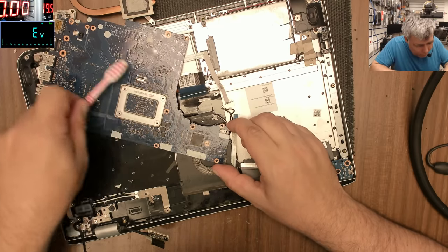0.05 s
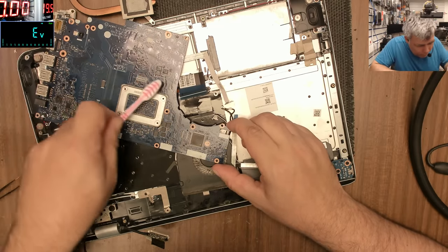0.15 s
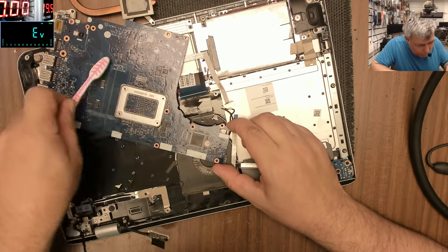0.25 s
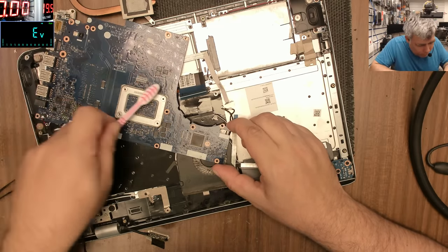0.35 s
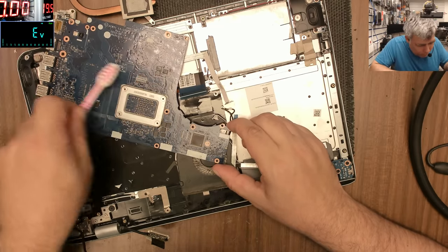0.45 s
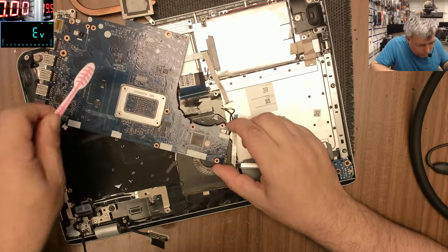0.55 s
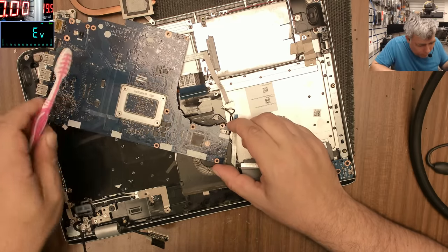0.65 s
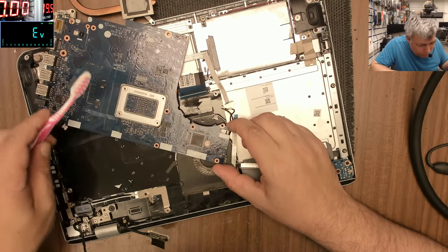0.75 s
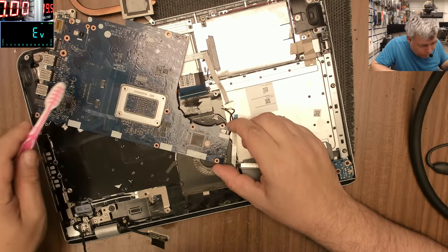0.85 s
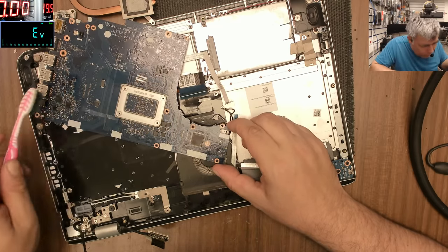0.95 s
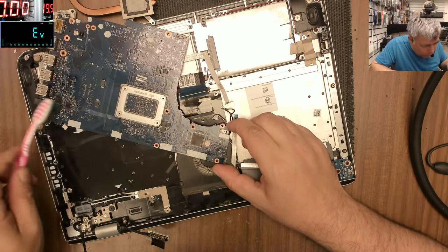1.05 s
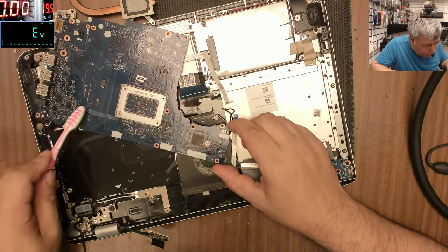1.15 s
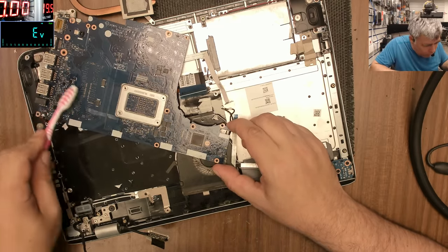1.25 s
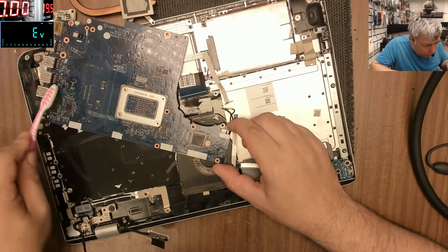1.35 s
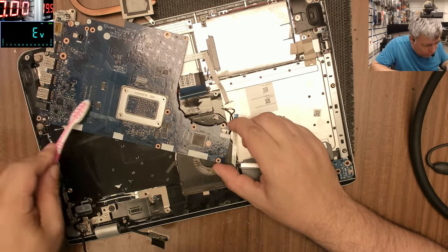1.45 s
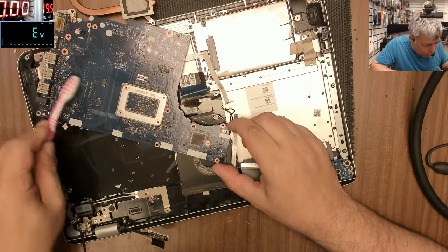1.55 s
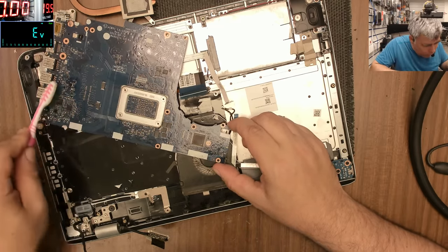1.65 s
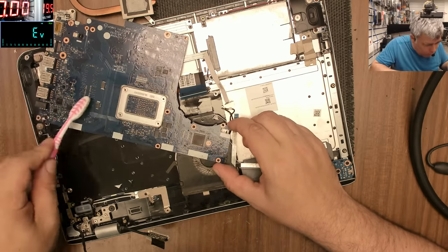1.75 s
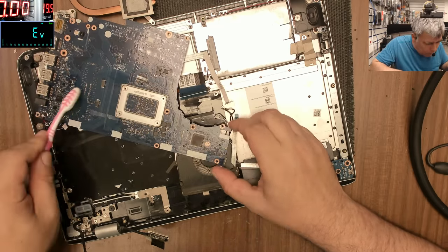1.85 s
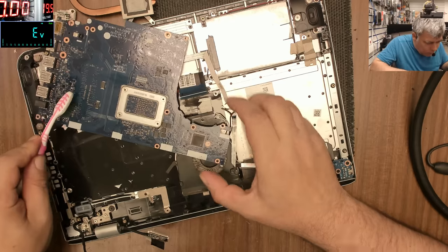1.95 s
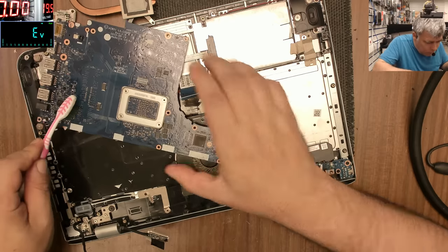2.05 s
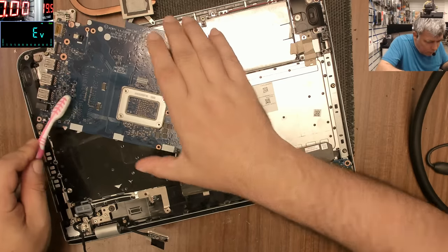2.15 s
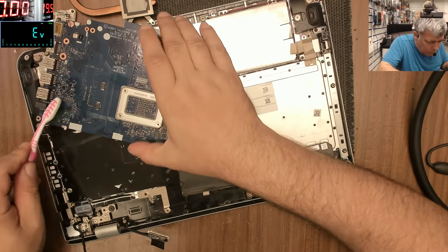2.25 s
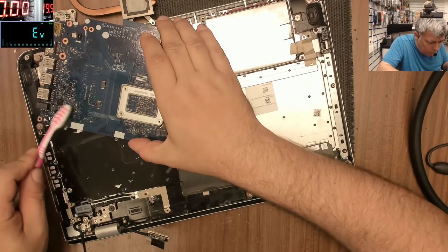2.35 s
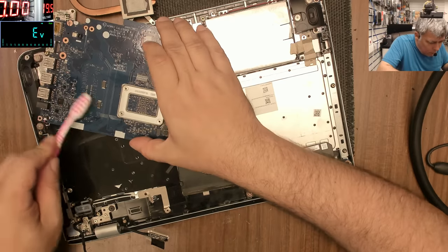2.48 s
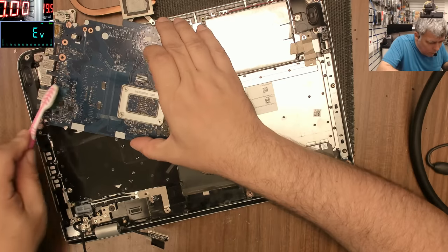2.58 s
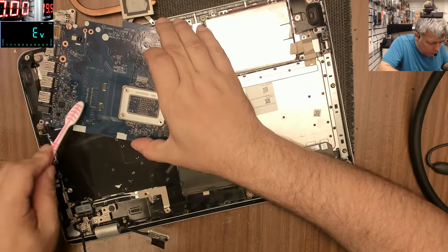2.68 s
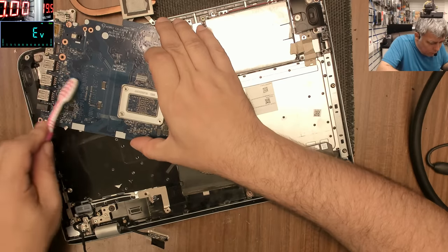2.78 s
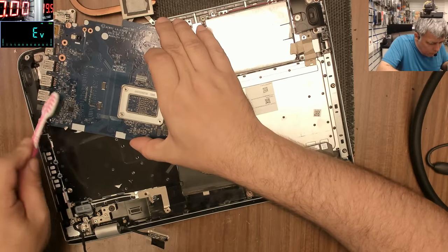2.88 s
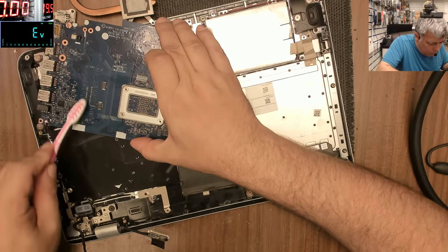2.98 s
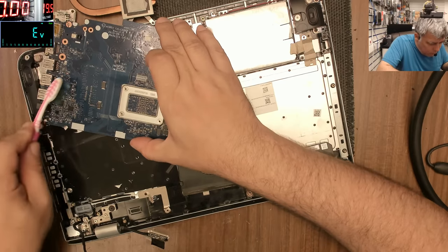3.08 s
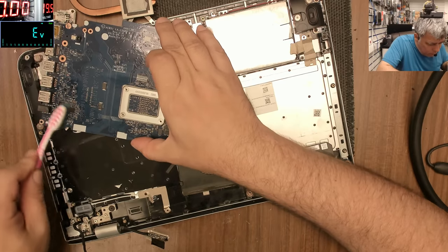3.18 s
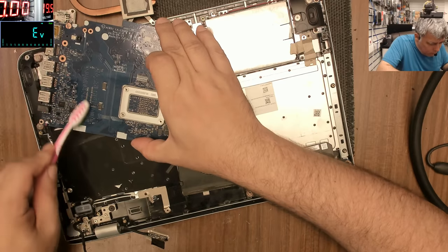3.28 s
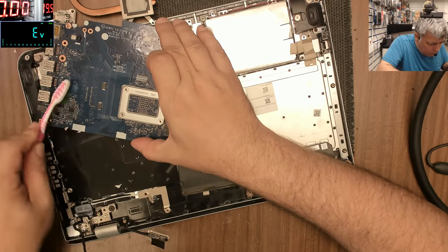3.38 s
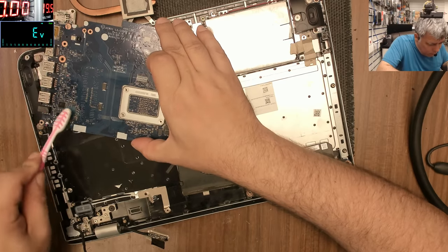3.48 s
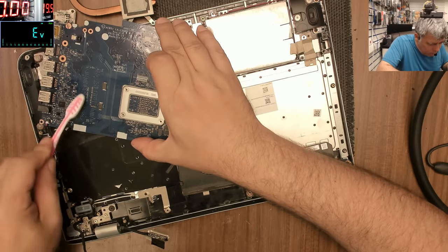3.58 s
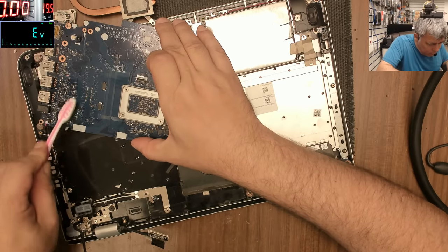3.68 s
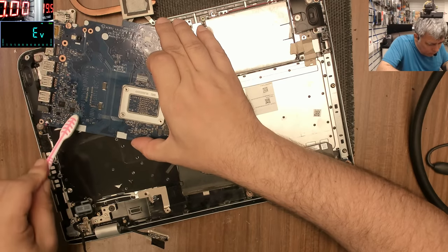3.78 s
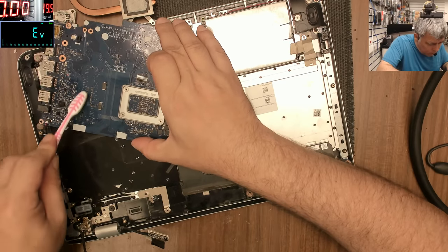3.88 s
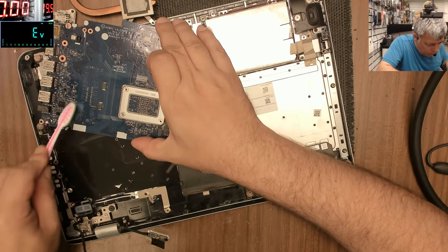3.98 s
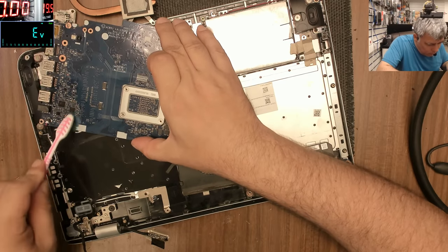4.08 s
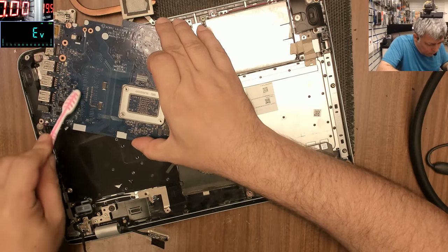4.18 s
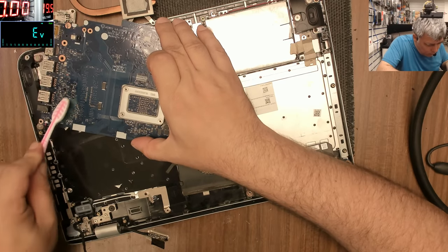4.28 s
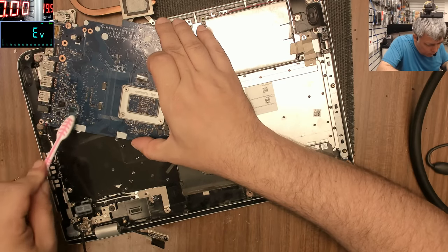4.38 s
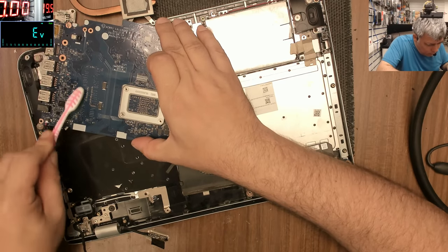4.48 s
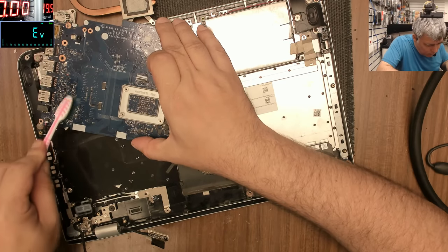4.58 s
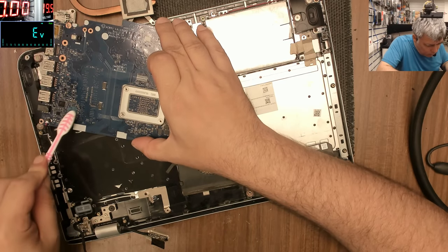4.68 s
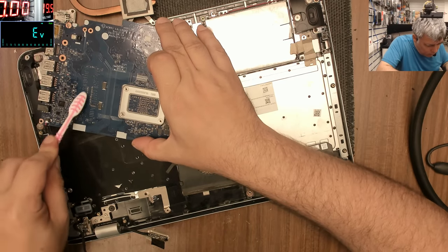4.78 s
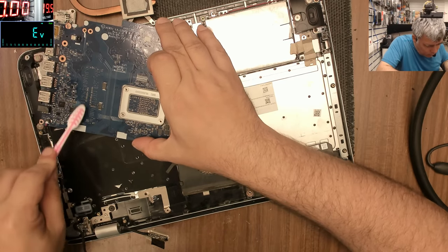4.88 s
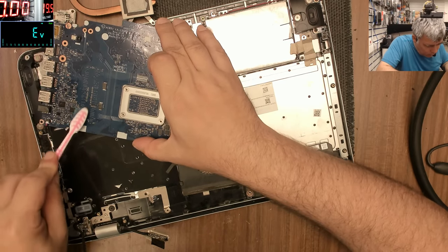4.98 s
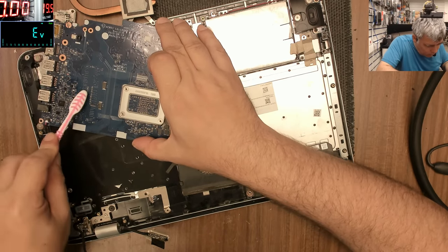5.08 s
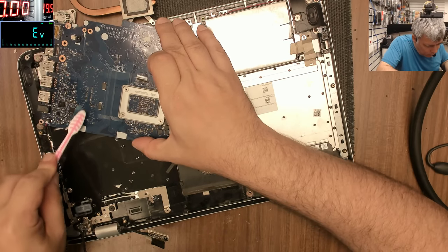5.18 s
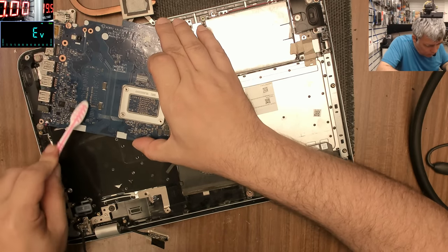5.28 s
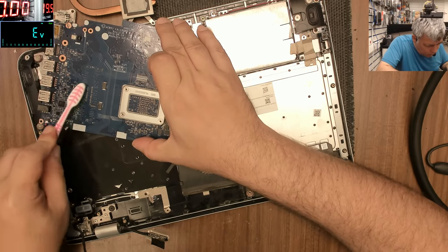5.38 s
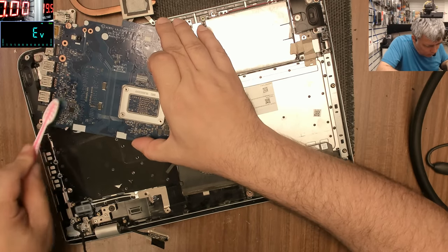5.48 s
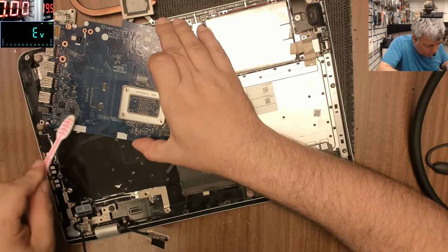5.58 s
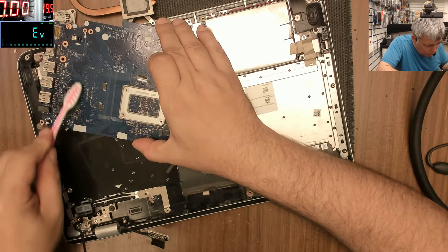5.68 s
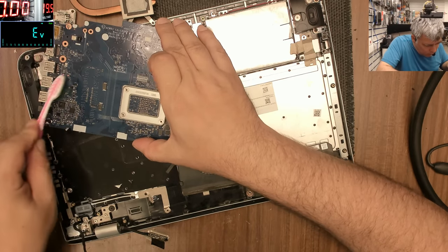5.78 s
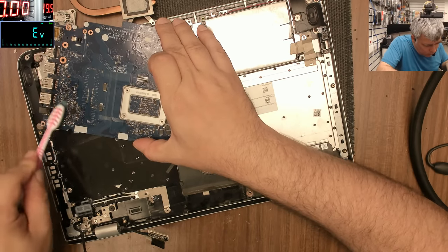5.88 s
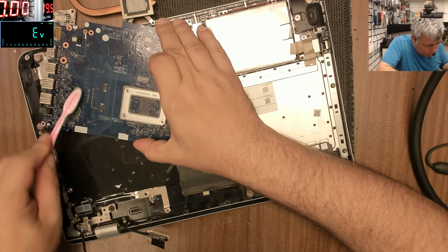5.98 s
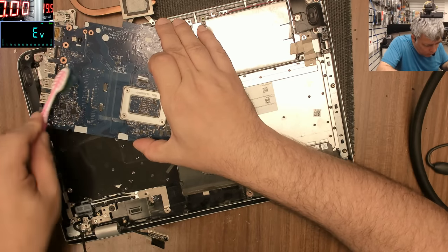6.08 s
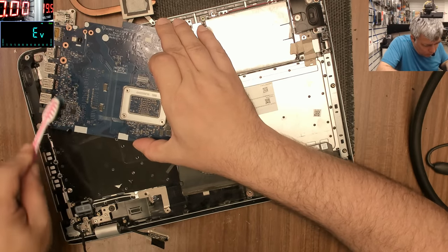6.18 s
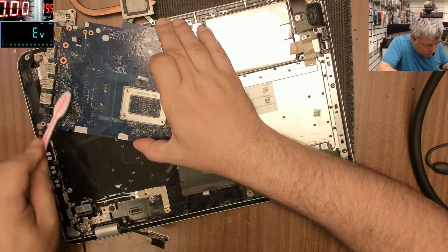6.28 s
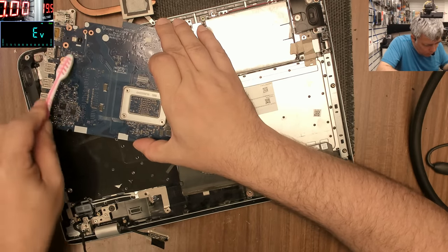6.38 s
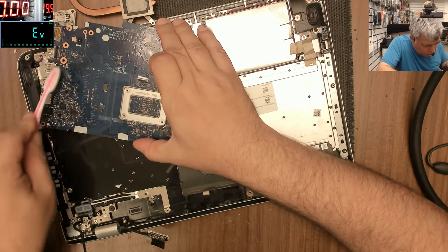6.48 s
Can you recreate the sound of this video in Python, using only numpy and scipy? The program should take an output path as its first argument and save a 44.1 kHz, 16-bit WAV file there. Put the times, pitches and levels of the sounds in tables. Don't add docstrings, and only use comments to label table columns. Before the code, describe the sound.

Dry bristles rasp over electronic parts in brief bouts, then about seven strokes a second, with faint metallic ringing, plastic clicks and soft bench bumps.

```python
import sys
import numpy as np
from scipy import signal
from scipy.fft import rfft, irfft
from scipy.io import wavfile
from scipy.ndimage import uniform_filter1d

SR = 44100
rng = np.random.default_rng(int(sys.argv[2]) if len(sys.argv) > 2 else 0)


def wav_record(signal):
    frames = np.transpose(np.atleast_2d(signal))
    bounded = np.clip(frames, -1, 1)
    quanta = np.round(bounded * 32767).astype(np.int16)
    wavfile.write(sys.argv[1], SR, quanta)


def elevation(decibels):
    levels = np.asarray(decibels, float)
    return 10 ** (levels / 20)


N = 288414


def in_time(points):
    s, level = np.transpose(points)
    return np.interp(np.arange(N) / SR, s, level)


def rms_one(x):
    return x / np.sqrt(np.mean(x ** 2) + 1e-20)


def coloured(x, points):
    hz, db = np.transpose(points)
    shape = np.interp(np.log(np.fft.rfftfreq(N, 1 / SR) + 1), np.log(hz), db)
    return rms_one(irfft(rfft(x) * elevation(shape), N))


def resonate(x, modes):
    out = 0
    for k, (hz, width_hz, db) in enumerate(modes):
        r = np.exp(-np.pi * width_hz / SR)
        a = [1, -2 * r * np.cos(2 * np.pi * hz / SR), r * r]
        ring = (1 - r * r) / 2 * signal.lfilter([1, 0, -1], a, x + 1e-18)
        out = out + (-1) ** k * elevation(db) * ring
    return out


def flicks(per_s, spread_db):
    sizes = elevation(spread_db * np.minimum(rng.exponential(1, N), 4)) * rng.choice([-1, 1], N)
    return sizes * (rng.random(N) < per_s / SR)


def clumps(hz):
    r = np.exp(-2 * np.pi * hz / SR)
    wander = signal.lfilter([1], [1, -2 * r, r * r], rng.standard_normal(N + SR))
    return rms_one(wander[SR:])


def each_by_chance(x, modes, patchy_db, hz):
    return sum(resonate(x * elevation(patchy_db * clumps(hz)), [mode]) for mode in modes)


def add(out, s, sound):
    start = round(s * SR)
    out[start:start + len(sound)] += sound


# (f/Hz, level/dB)
HISS_COLOUR = [(8, 14.5), (20, 1.5), (38, -20), (60, -2), (100, -2.5), (200, -8), (400, -15.5),
               (1000, -19.5), (2200, -20), (7000, -18.5), (15500, -13.5)]
# (f/Hz, level/dB against the hiss)
HISS_SHARED = [(8, -8), (60, -6), (150, -2.5), (400, -1.5), (1500, -14), (15500, -6.5)]


def preamp_hiss():
    shared, left, right = rng.standard_normal((3, N))
    common = elevation(-8.5) * coloured(shared, HISS_SHARED)
    return elevation(-60) * coloured(common + np.array([left, right]), HISS_COLOUR)


# (t/s, level/dB)
MURMUR_LEVEL = [(0, -65), (.5, -65.5), (.9, -68), (1.4, -69.5), (2, -70.5), (2.6, -70.5), (5.7, -87.5),
                (6.54, -68)]
# (f/Hz, level/dB)
MURMUR_COLOUR = [(60, -16), (150, -3), (400, -6), (1000, -11), (3000, -12.5), (6000, -11), (12000, -14.5)]


def murmur():
    return elevation(in_time(MURMUR_LEVEL)) * coloured(rng.standard_normal(N), MURMUR_COLOUR)


# (f/Hz, level/dB)
FAN_COLOUR = [(100, 10.5), (200, -3.5), (400, 3), (800, -2.5), (1400, -2), (1800, -21), (3000, -23),
              (6000, -40.5), (12000, -22)]
# (f/Hz, width/Hz, level/dB)
FAN_HUMS = [(401.8, 10, -84), (2217, 14, -84)]


def fan():
    air = elevation(-72.5) * coloured(rng.standard_normal(N), FAN_COLOUR)
    white = rng.standard_normal(N)
    hums = 0
    for hz, width_hz, db in FAN_HUMS:
        hums = hums + elevation(db) * rms_one(resonate(white, [(hz, width_hz, 0)]))
    whine_hz = 1400 + 0.87 * clumps(2.12)
    whine_level = np.sqrt(2) * elevation(-77.5 + 1.2 * clumps(5.5))
    whine = whine_level * np.sin(2 * np.pi * np.cumsum(whine_hz) / SR)
    return air + hums + whine


# (opens t/s, shuts t/s)
GATE_OPEN = [
    (-0.1, 0.438),
    (1.410, 1.977),
    (2.581, 5.682),
    (5.773, 6.7),
]
GATE_GAIN = [2.5, -1.5, -0.5, 0.5]


def gate():
    t = np.arange(N) / SR
    gain = elevation(-37)
    for (opens_s, shuts_s), db in zip(GATE_OPEN, GATE_GAIN):
        gain = gain + elevation(db) * ((t > opens_s) & (t < shuts_s))
    return uniform_filter1d(gain, size=70)


# (t/s, level/dB, sway f/Hz, fade t/s)
ROCKS = [(0.028, -40.5, 13.4, 0.22), (0.104, -41.5, 6.7, 0.068), (0.293, -40.5, 10.3, 0.032),
         (0.464, -52, 10.2, 0.028), (1.482, -53.5, 10.9, 0.25), (1.682, -35.5, 7.5, 0.021),
         (1.752, -43.5, 10.5, 0.083), (1.856, -55, 14, 0.0054), (2.01, -44, 14.4, 0.022),
         (2.638, -46, 11.3, 0.4), (2.927, -36, 8.3, 0.063), (3.08, -51.5, 7.6, 0.51),
         (3.23, -36.5, 13.2, 0.14), (3.513, -33, 9.7, 0.088), (3.779, -32.5, 9.4, 0.065),
         (4.063, -35.5, 12, 0.13), (4.384, -41.5, 15.4, 0.21), (4.667, -35, 11.2, 0.083),
         (4.814, -47, 15.0, 0.15), (4.963, -37, 12.6, 0.12), (5.245, -36, 12.2, 0.24),
         (5.456, -43, 7.6, 0.02), (5.529, -37, 11.4, 0.2), (5.67, -39.5, 12.0, 0.075),
         (5.897, -38, 7.3, 0.035), (6.13, -49, 16.2, 0.94), (6.232, -38, 9.5, 0.12),
         (6.475, -46.5, 11.3, 0.013)]


def rocking():
    out, t = np.zeros(N), np.arange(N) / SR
    rise_s, lead_rad = 0.045, 1.17
    for s, db, hz, fade_s in ROCKS:
        near = slice(max(round((s - .2) * SR), 0), round((s + 1.2) * SR))
        u = t[near] - s
        shape = np.where(u < 0, np.exp(-(u / rise_s) ** 2 / 2), np.exp(-u / fade_s))
        out[near] -= elevation(db) * shape * np.cos(2 * np.pi * hz * u + lead_rad)
    return out


# (t/s, level/dB)
JOLTS = [(0.045, -62.5), (0.194, -73), (0.4, -66), (1.45, -66), (1.664, -63.5), (1.754, -67.5),
         (1.965, -64), (2.585, -62), (2.73, -67), (2.87, -64.5), (3.1, -61), (3.25, -65.5), (3.48, -56),
         (3.741, -58), (4.04, -59), (4.34, -65), (4.59, -57), (4.91, -60), (5.2, -60), (5.35, -66),
         (5.54, -63.5), (5.8, -62), (6.065, -66), (6.229, -64), (6.35, -66), (6.53, -65)]


def jolts():
    rise_db_per_s, fall_db_per_s = 253, 75
    t = np.arange(0, N, 64) / SR
    s, db = np.transpose(JOLTS)[:, :, None]
    away_db = np.where(t < s, rise_db_per_s * (s - t), fall_db_per_s * (t - s))
    loudest_db = (db - away_db).max(axis=0)
    return elevation(np.interp(np.arange(N) / SR, t, loudest_db))


# (f/Hz, width/Hz, level/dB)
BENCH_TONES = [(57, 16.2, -7), (73.6, 13, -2.5), (86.3, 11.9, 0), (103.2, 12.6, -0.5), (109.6, 35, -12.5)]


def bench_rumble():
    return rms_one(resonate(rng.standard_normal(N), BENCH_TONES)) * jolts()


# (t/s, level/dB, f/Hz, time to fall 60 dB t/s)
THUDS = [(1.411, -59, 377, 0.027), (1.478, -54, 1400, 0.013), (1.479, -55, 670, 0.02),
         (2.5809, -49, 129, 0.051), (2.5808, -49, 300, 0.02), (2.597, -54, 420, 0.026),
         (1.6074, -54, 1100, 0.018), (1.612, -50.5, 770, 0.02), (2.5832, -48, 490, 0.014),
         (2.592, -47, 1280, 0.019), (2.596, -45, 1300, 0.071), (2.814, -60.5, 1290, 0.11),
         (3.062, -59.5, 1263, 0.071), (3.464, -57, 1460, .047), (3.699, -56.5, 1400, 0.13),
         (3.70, -61, 1065, 0.098), (4.008, -64, 1060, 0.1), (4.31, -61, 1460, 0.04),
         (5.426, -62, 1310, .04), (5.774, -66, 500, 0.01), (5.835, -62, 1064, 0.1),
         (6.2103, -36, 1073, 0.021), (6.215, -49, 1078, 0.073), (6.503, -59, 1360, 0.049)]


def thuds():
    out, t = np.zeros(N + SR), np.arange(SR // 8) / SR
    rise = 1 - np.exp(-(t / 0.0015) ** 2)
    for s, db, hz, t60 in THUDS:
        pair = np.sin(2 * np.pi * hz * t) + elevation(-5) * np.sin(2 * np.pi * hz * 1.045 * t)
        add(out, s, elevation(db - 60 * t / max(t60, .005)) * rise * pair)
    return out[:N]


# (t/s, level/dB, brightest f/Hz)
CRACKS = [(1.412, -48, 6500), (1.429, -44, 6500), (1.478, -43, 3060), (1.528, -36, 5200),
          (1.6068, -48, 3640), (1.61, -48, 3500), (2.5828, -54, 5500), (2.5965, -37, 9600),
          (2.5973, -37.5, 3900), (4.461, -61, 4500), (5.784, -42, 5300), (6.209, -47, 6700),
          (6.2118, -39, 4200), (6.219, -43, 8150), (6.2198, -35.5, 3800)]
# (t/s, level/dB, brightest f/Hz)
MORE_CRACKS = [(0.0672, -56, 6480), (0.162, -48, 8250), (0.2987, -51, 3060), (0.389, -53, 6520),
               (1.5015, -50, 8660), (1.559, -50, 2900), (1.576, -55, 2900), (1.6676, -52, 4040),
               (1.71, -56, 2300), (3.0135, -59, 4100), (3.6905, -47.5, 6100), (3.9404, -51, 10600),
               (4.2333, -52, 7490), (4.4268, -64, 4080), (4.9821, -56, 4330), (5.2579, -56, 4010),
               (5.5987, -50, 4100), (5.9698, -47, 3800), (6.1619, -53, 3840), (6.4532, -47, 8530)]
# (f/Hz, width/Hz, level/dB)
HEAD_TONES = [(2430, 700, -2.5), (3350, 820, -3.5), (3900, 300, 1), (4500, 650, -5), (5430, 780, -7),
              (6300, 410, 0), (8000, 820, -2), (10600, 540, -6)]


def cracks():
    out, t = np.zeros(N + SR), np.arange(SR // 8) / SR
    for s, db, crack_hz in CRACKS + MORE_CRACKS:
        modes = [(crack_hz, crack_hz / 12, -1)]
        head = [(f, width, mode_db - 9 * np.log2(f / crack_hz) ** 2) for f, width, mode_db in HEAD_TONES]
        burst = elevation(-60 * t / .012) * rng.standard_normal(len(t)) / 6 + (t == 0)
        crack = resonate(burst, head + modes)
        add(out, s, elevation(db) * crack / np.abs(crack).max())
    return out[:N]


# (start t/s, ring f/Hz, level/dB)
SHIELD_SNAGS = [(2.896, 3940, -61), (3.005, 4070, -54), (3.2, 3820, -61), (3.3, 3900, -59.5),
                (3.432, 3940, -60.5), (3.544, 4030, -62), (3.69, 4010, -61.5), (3.985, 3980, -53),
                (4.131, 3900, -62), (4.307, 3870, -63), (4.418, 4050, -58.5), (4.561, 3900, -68),
                (4.715, 3910, -62.5), (4.865, 3900, -65), (4.985, 3880, -63), (5.148, 3950, -64),
                (5.29, 3800, -58), (5.552, 3940, -67), (5.601, 3980, -61), (5.962, 3800, -55),
                (6.072, 4060, -59.5), (6.154, 3870, -56.5), (6.282, 3980, -59.5), (6.498, 3980, -57)]
# (start t/s, ring f/Hz, level/dB)
PART_SNAGS = [(0.07, 6300, -70), (0.075, 7300, -69), (0.176, 6870, -61), (0.179, 6180, -61),
              (0.184, 7440, -67), (0.295, 3060, -65), (0.311, 6100, -67), (0.399, 5900, -67),
              (1.411, 6130, -66), (1.682, 4280, -70), (5.42, 6900, -63), (2.613, 6700, -60),
              (2.879, 733, -69.5), (3.141, 7180, -59), (3.685, 5980, -56.5), (3.69, 5170, -70),
              (3.019, 4760, -67), (2.81, 6100, -67), (2.8, 5000, -74), (3.821, 3250, -73),
              (3.965, 5910, -60), (5.003, 5440, -60), (5.002, 6730, -59.5), (5.14, 5100, -67),
              (5.447, 6540, -57.5), (5.781, 6650, -60), (5.782, 5260, -63.5), (5.957, 4530, -60),
              (6.077, 6580, -59.5), (6.276, 6100, -61), (6.288, 8900, -66), (6.304, 6770, -61),
              (6.512, 3090, -61), (6.512, 5900, -59)]


def snags():
    out, t = np.zeros(N + SR), np.arange(SR // 6) / SR
    attack_s, fade_s, loud_part_s = 0.004, 0.018, 0.026
    swell = (1 - np.exp(-t / attack_s)) * np.exp(-t / fade_s)
    for s, hz, db in SHIELD_SNAGS + PART_SNAGS:
        noise = rng.standard_normal(len(t))
        spiky = noise * np.abs(noise)
        modes = [(hz, 42, 0), (1.02 * hz, .015 * hz, -11), (.975 * hz, .02 * hz, -13)]
        ring = resonate(spiky * swell, modes)
        add(out, s, elevation(db) * ring / np.std(ring[:round(loud_part_s * SR)]))
    return out[:N]


# (middle t/s, length t/s, bristle level/dB, shield against bristle level/dB)
FIRST_STROKES = [
    (-0.005, 0.094, -66, -7),
    (0.081, 0.038, -56, -14),
    (0.186, 0.046, -56.5, -21),
    (0.308, 0.042, -57, -10),
    (0.419, 0.056, -54.5, -20),
    (1.416, 0.025, -55.5, -15),
    (1.547, 0.12, -59.5, -9),
    (1.678, 0.083, -57.5, -9),
    (1.848, 0.1, -65.5, -4),
    (1.917, 0.095, -87, -26),
]
SCRUB_STROKES = [(2.623, 0.075, -56.5, -4), (2.829, 0.19, -59, -12), (2.903, 0.052, -56, -5),
                 (3.028, 0.085, -58, -15), (3.147, 0.12, -56, -7), (3.309, 0.053, -55.5, -6),
                 (3.425, 0.1, -57, -6), (3.565, 0.056, -58.5, -7), (3.692, 0.056, -57, -9),
                 (3.83, 0.088, -61, -5), (3.978, 0.089, -57, -1.5), (4.131, 0.1, -59.5, -2),
                 (4.285, 0.11, -58, -9.5), (4.44, 0.083, -59, 6.5), (4.575, 0.12, -59.5, -6.5),
                 (4.735, 0.08, -58.5, 1), (4.874, 0.067, -58.5, -3), (5.001, 0.083, -57.5, -2.5),
                 (5.15, 0.064, -59, -8), (5.289, 0.084, -57.5, 2.5), (5.442, 0.12, -58, -10),
                 (5.658, 0.11, -59.5, -1.5), (5.825, 0.13, -57, -6), (5.963, 0.085, -58, -7),
                 (6.12, 0.29, -61, -3.5), (6.304, 0.095, -55, -0.5), (6.474, 0.084, -57, -8),
                 (6.532, 0.055, -62, -3)]
# (t/s, drag level/dB)
REST_WEIGHT = [(0, -70), (0.4, -68), (1.45, -59.5), (1.75, -68.5), (2.0, -69.5), (2.7, -63), (3.25, -64.5),
               (3.75, -68), (3.95, -75), (4.5, -91), (5.2, -69), (5.38, -83), (5.55, -64), (5.9, -89),
               (6.05, -59), (6.2, -63), (6.4, -72), (6.54, -55.5)]


def stroke_pressure():
    t, strokes = np.arange(N) / SR, FIRST_STROKES + SCRUB_STROKES
    middle, _, stroke_db, shield_db = np.transpose(strokes)
    edge_db, squareness = 5.5, 2.46
    onset = 0.82
    power = elevation(in_time(REST_WEIGHT)) ** 2
    for s, length_s, db, _ in strokes:
        near = slice(max(round((s - .15) * SR), 0), round((s + .15) * SR))
        u = np.where(t[near] < s, 1 / onset, onset) * (t[near] - s)
        power[near] += elevation(db - edge_db * np.abs(2 * u / length_s) ** squareness) ** 2
    bristle = np.sqrt(power)
    shield = bristle * elevation(np.interp(t, middle, shield_db))
    board_db = -66.5 + 0.64 * (stroke_db + 55.5) - stroke_db
    board = bristle * elevation(np.interp(t, middle, board_db))
    return bristle, shield, board


# (f/Hz, width/Hz, level/dB)
BOARD_TONES = [(750, 110, -3), (1051, 106, 1), (1290, 92, 2.5), (1404, 280, -8), (2340, 400, -1),
               (3060, 340, -1.5)]


def board_thrum(board):
    thrum = each_by_chance(flicks(900, 1.2), BOARD_TONES, patchy_db=0.9, hz=9.0)
    return rms_one(thrum) * board * elevation(-2.0)


# (f/Hz, width/Hz, level/dB)
SHIELD_TONES = [(3800, 24.6, 1.5), (3870, 40, -5), (3940, 99, -4.5), (3980, 18, 4), (4070, 36, 4)]
# (f/Hz, width/Hz, level/dB)
SHIELD_UPPER_TONES = [(4740, 650, 8.5), (6100, 210, 2), (6700, 83, -25), (7230, 190, 5), (8070, 1300, 13),
                      (8900, 990, 7), (10100, 780, 2), (10940, 570, 7)]
# (f/Hz, width/Hz, level/dB)
PART_TONES = [(3060, 50, -8), (4650, 50, 1.5), (5170, 35, 2.5), (5500, 50, -3.5), (5900, 33, 0.5),
              (6100, 89, -2.5), (6540, 55, 2.5), (7040, 63, 2.5), (7300, 100, -1), (7910, 98, -6),
              (8900, 79, -7)]


def ringing_metal(bristle, shield):
    hard = flicks(1500, 0.79) * elevation(1.25 * clumps(49))
    late_shield = np.roll(shield, round(0.01 * SR))
    main = each_by_chance(rms_one(hard) * late_shield, SHIELD_TONES, patchy_db=2.5, hz=26) * elevation(13.0)
    upper = rms_one(each_by_chance(hard, SHIELD_UPPER_TONES, patchy_db=5.0, hz=9)) * bristle * elevation(-7)
    parts = rms_one(each_by_chance(hard, PART_TONES, patchy_db=3.8, hz=9)) * bristle * elevation(-10.5)
    return main + upper + parts


# (f/Hz, level/dB)
CONNECTOR_COLOUR = [(1500, -27), (2100, -4), (3100, -0.5), (4000, -1.5), (5300, -4), (6200, 3.5),
                    (8000, -5), (10500, -1), (12500, -27), (16000, -5)]
# (f/Hz, level/dB)
BRISTLE_COLOUR = [(1500, -17), (2200, -14), (3200, -7.5), (4300, -3.5), (5300, 0), (6800, -1.5), (9000, -5),
                  (11000, -4.5), (12500, -14.5), (16000, -9)]


def bristle_hiss(bristle):
    dense = flicks(7000, 1.35)
    on_connectors = np.arange(N) < 1.0 * SR
    tips = np.where(on_connectors, coloured(dense, CONNECTOR_COLOUR), coloured(dense, BRISTLE_COLOUR))
    return tips * elevation(1.44 * clumps(77)) * bristle


def brush():
    bristle, shield, board = stroke_pressure()
    return board_thrum(board) + ringing_metal(bristle, shield) + bristle_hiss(bristle)


def scene():
    gated = gate() * (fan() + bench_rumble() + thuds() + cracks() + snags() + brush())
    near = gated + rocking() + murmur()
    return np.array([near, np.roll(near, shift=1)]) + preamp_hiss()


def low_pass(x):
    return signal.sosfilt(signal.butter(12, 17060, fs=SR, output="sos"), x)


def record(dry):
    left, right = rfft(dry)
    hz = np.fft.rfftfreq(N, 1 / SR)
    nearly_left = left + elevation(-16.5) * (right - left)
    joined_right = np.where(hz > 7450, nearly_left, right)
    mix = irfft(np.array([left, joined_right]) * (hz < 15800), N)
    return low_pass(mix)


dry = scene()
out = record(dry)
wav_record(out)
```